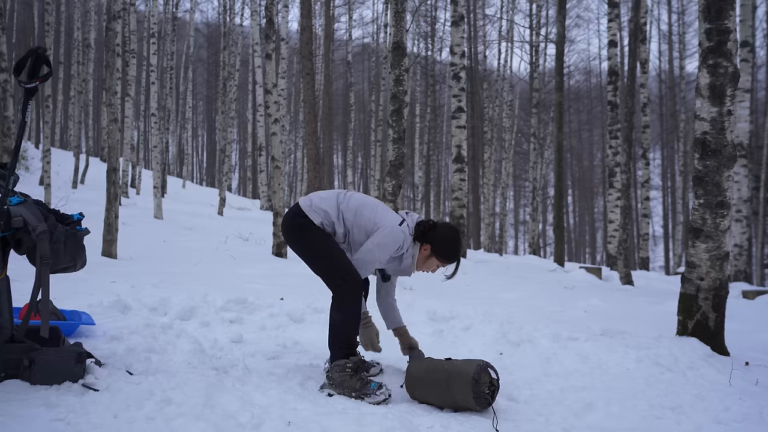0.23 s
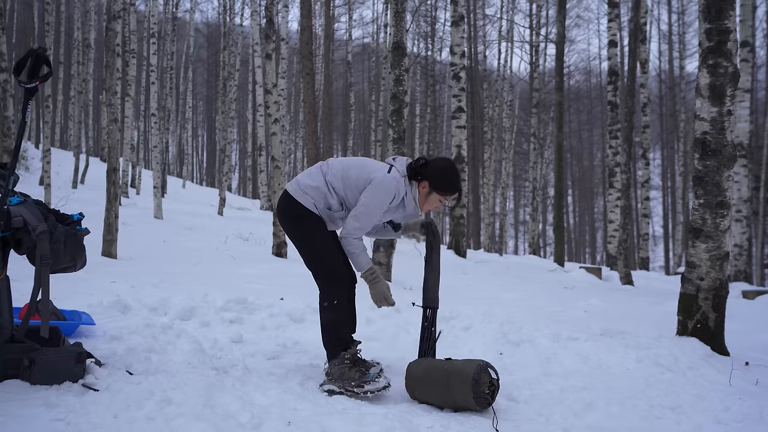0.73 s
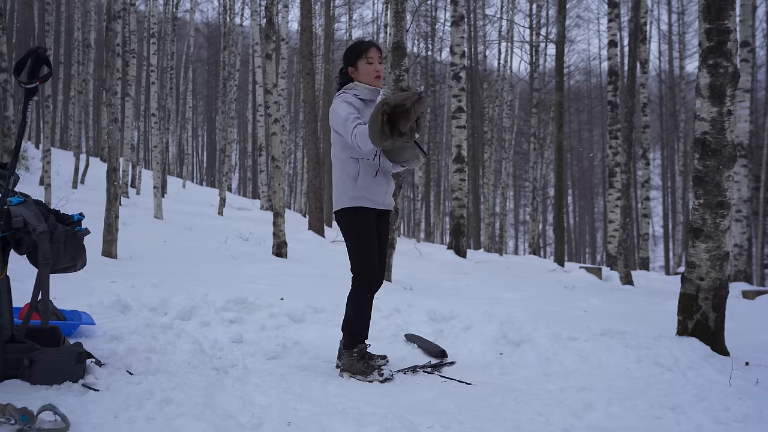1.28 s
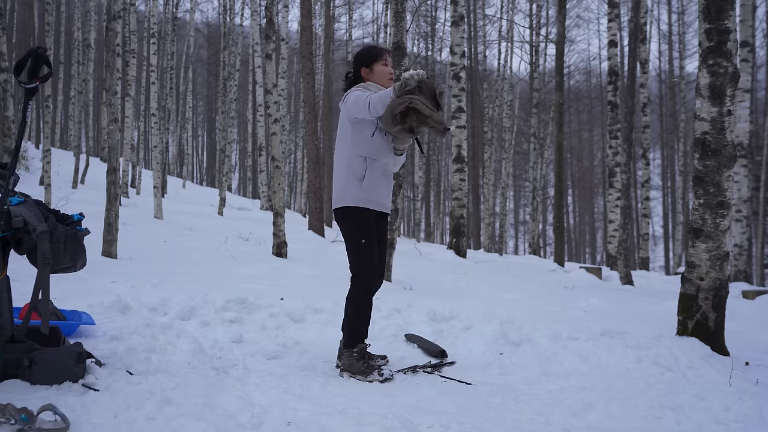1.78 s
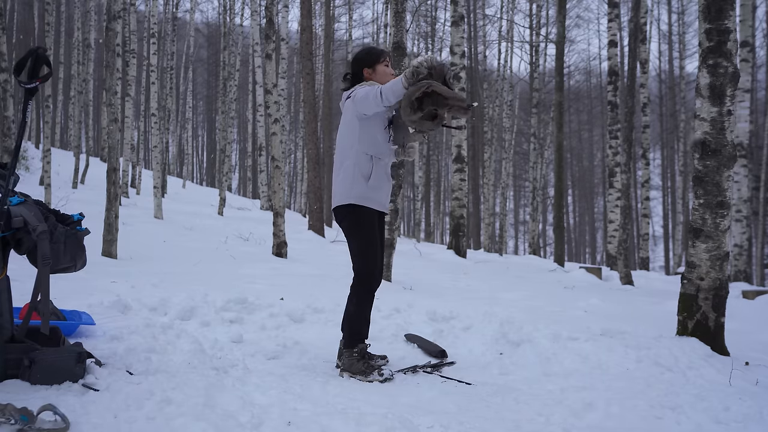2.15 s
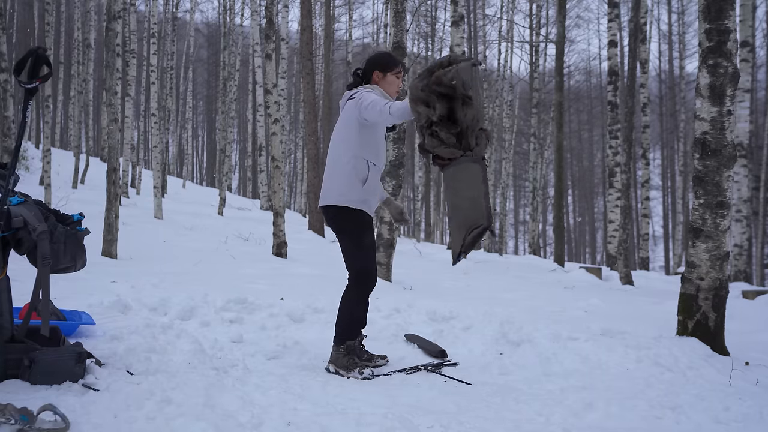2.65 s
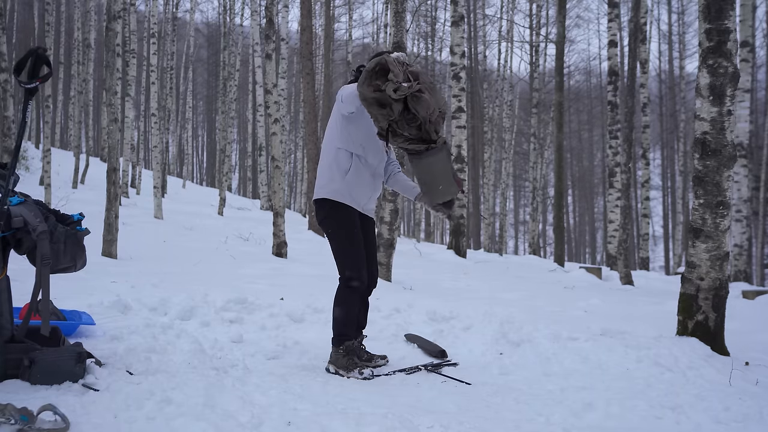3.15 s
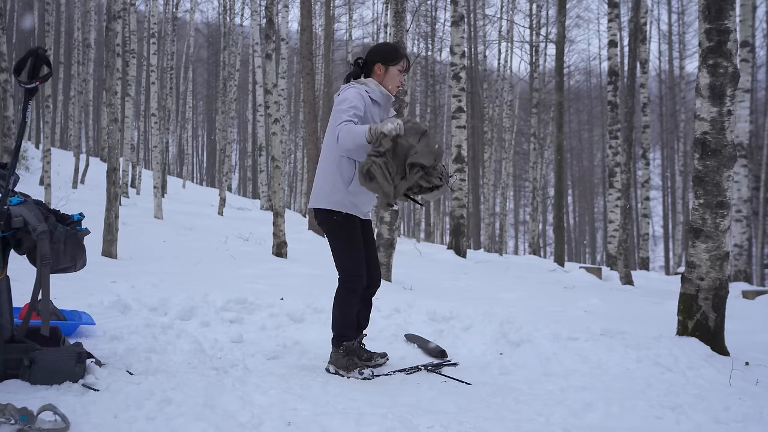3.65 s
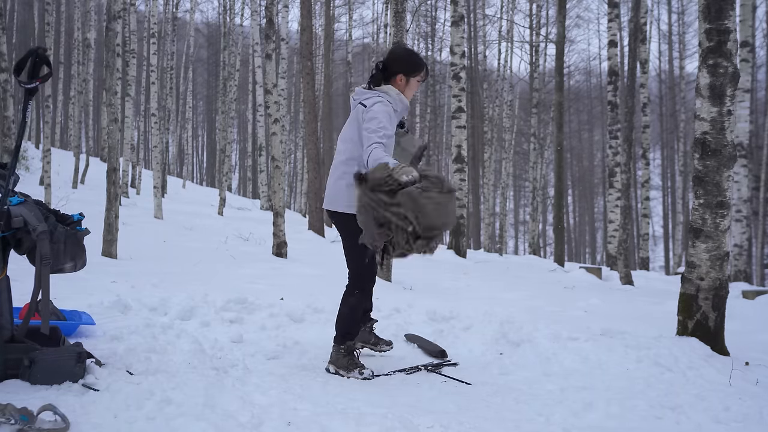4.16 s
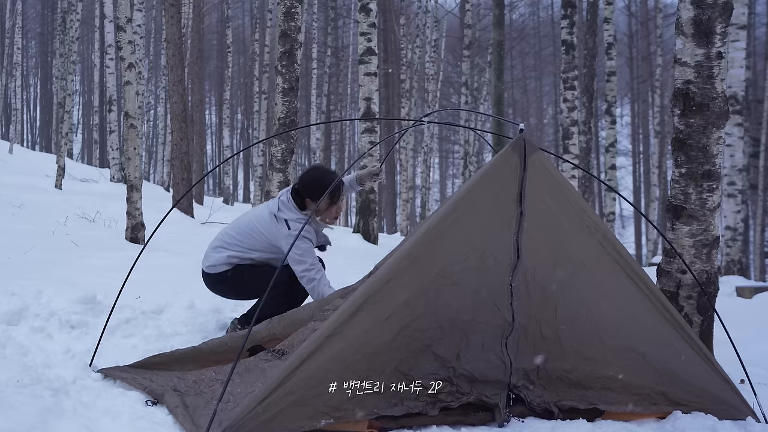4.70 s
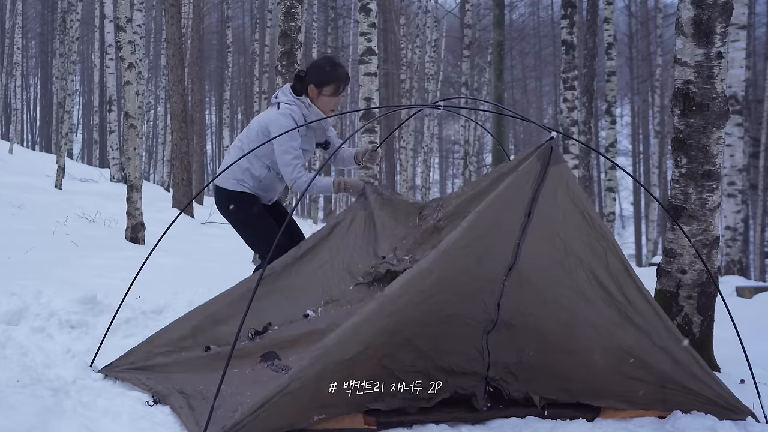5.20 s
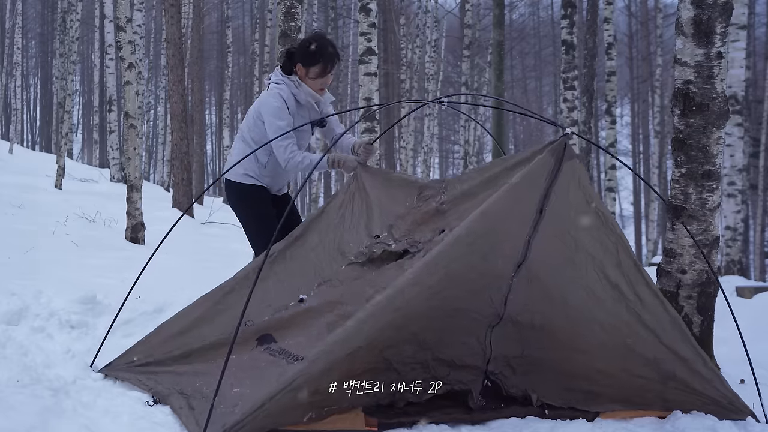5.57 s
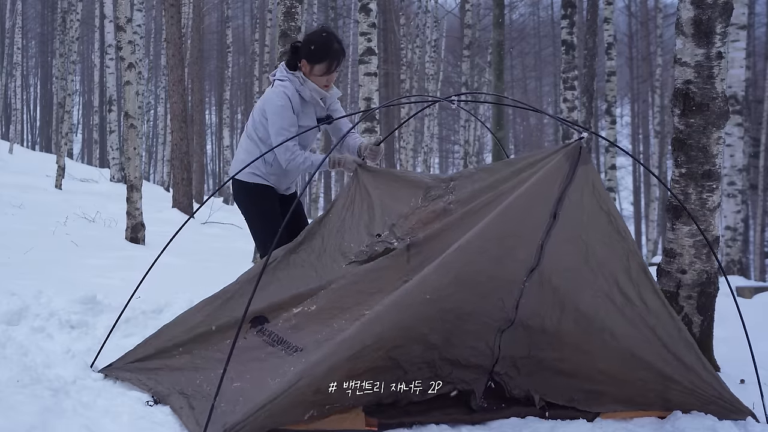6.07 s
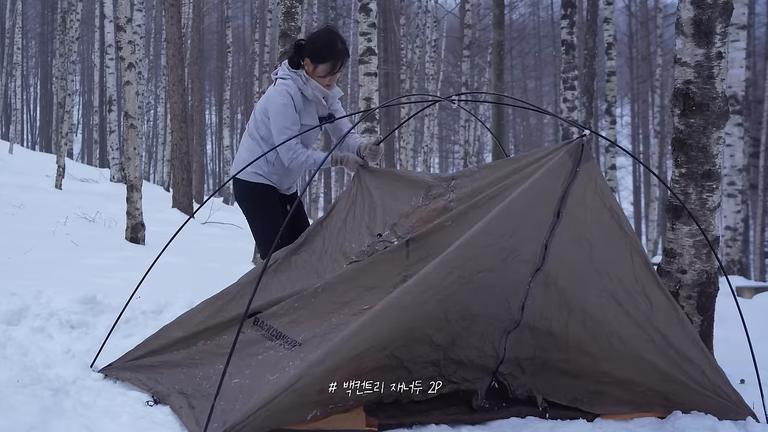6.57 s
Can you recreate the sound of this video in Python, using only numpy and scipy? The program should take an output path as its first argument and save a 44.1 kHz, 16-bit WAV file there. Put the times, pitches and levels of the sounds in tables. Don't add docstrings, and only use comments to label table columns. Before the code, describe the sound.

Stiff tent nylon rustles and crackles up close: a bag tugged out, metal pegs rattling briefly, cloth heaved, bundled, then a wide sheet lifted.

```python
import sys
import numpy as np
from scipy import signal
from scipy.fft import rfft, irfft, next_fast_len
from scipy.io import wavfile
from scipy.ndimage import uniform_filter1d

SR = 44100
rng = np.random.default_rng(int(sys.argv[2]) if len(sys.argv) > 2 else 0)


def persist_wave(psi):
    counts = np.round(np.clip(psi, -1, 1) * 32767).astype(np.int16)
    wavfile.write(sys.argv[1], SR, np.atleast_2d(counts).T)


def volts_from_db(level):
    exponent = np.asarray(level, float) / 20
    return 10 ** exponent


N = 301644
TIME = np.arange(N) / SR
SILENT_DB = -120.

# start_s, end_s
SPANS = ((0, .955), (.955, 1.252), (1.257, 3.224), (3.224, 4.713), (4.717, 6.84))
# crackles_per_s, size_spread_db, crackle_ms, crackle_share_db, flicker_db, fleck_hz, fleck_db
NYLON_GRAIN = (600, 4.4, 2.8, 2.2, 1.94, 2840, 1.7)
# t60_ms, rise_ms, broad_part_db, first_kick_over_tail
NYLON_SNAP = (8, 0.8, -2.5, 2.5)


def unit(x):
    return x / np.sqrt(np.mean(x ** 2))


def band(x, low_hz, high_hz, order):
    return signal.sosfilt(signal.butter(order, (low_hz, high_hz), "band", fs=SR, output="sos"), x)


def fade_in(start_s, length_s):
    return np.clip((TIME - start_s) / length_s, 0, 1)


def walk(rate, n=N):
    hold = int(SR / rate)
    held = rng.standard_normal(n // 500)[np.arange(n) // hold]
    return unit(uniform_filter1d(uniform_filter1d(held, hold), hold))


def cloth(levels, tone, rate, spread_db, ms, share_db, flicker_db, fleck_hz, fleck_db):
    live = np.flatnonzero(levels[0] > -100)
    n = next_fast_len(len(live) + 4096)
    part = np.pad(levels[:, live], ((0, 0), (0, n - len(live))), constant_values=SILENT_DB)
    hz = np.maximum(np.arange(n // 2 + 1) * SR / n, 1)
    shared = crackle(rate, spread_db, ms, n)
    tug = walk(21.77, n)
    spectrum = 0
    for gain, db, grainy in zip(registers(tone, hz), part, (0.68, 0.71, 0.71, 0.78)):
        own = crackle(rate, spread_db, ms, n)
        creases = 0.92 * shared ** 2 + 0.27 * own ** 2
        grain = np.sqrt(1 + (grainy * volts_from_db(share_db)) ** 2 * creases)
        flicker = volts_from_db(flicker_db * (tug + 0.49 * walk(30.12, n)))
        drive = grain * flicker * volts_from_db(db) * rng.standard_normal(n)
        scale = np.sqrt(np.mean(gain ** 2) * np.mean(drive ** 2) / np.mean(volts_from_db(db) ** 2))
        spectrum = spectrum + gain * rfft(drive) / scale
    whole = np.zeros(2 * N)
    whole[live[0]:live[0] + n] = irfft(spectrum, n)
    return whole[:N] + flecks(levels[0], rate, fleck_hz, fleck_db)


def registers(tone, hz):
    split_hz = (700, 2800, 8000)
    tone_hz, db = np.transpose(tone)
    gain = volts_from_db(np.interp(np.log(hz), np.log(tone_hz), db))
    low, mid, high = (1 / (1 + (edge / hz) ** 5) for edge in split_hz)
    return gain * np.sqrt([mid - high, 1 - low, low - mid, high])


def crackle(rate, spread_db, ms, n):
    chance = rng.random((2, n))
    size_db = spread_db * np.minimum(-np.log(1 - chance[1]), 3)
    power = (chance[0] < rate / SR) * volts_from_db(size_db) ** 2
    for share in (.6, 1.4):
        power = signal.lfilter([1], [1, -np.exp(-1000 / (share * ms * SR))], power)[::-1]
    return unit(np.sqrt(np.abs(power)))


def flecks(swish_db, rate, hz, db):
    when, pitch, size = rng.random((N // 50, 3)).T
    wanted = np.arange(len(when)) < rate * N / SR
    heard = wanted & (swish_db[(when * N).astype(int)] > -100)
    start = (when[heard] * N).astype(int)[:, None]
    t = np.arange(256)
    turns = hz * 2.2 ** (2 * pitch[heard, None] - 1) * t / SR
    size_db = db + swish_db[start] - 3 * np.log(1 - .95 * size[heard, None])
    pops = volts_from_db(size_db) * np.sin(2 * np.pi * turns) * np.exp(-turns / 1.4) * np.minimum(turns, 1)
    return np.bincount((start + t).ravel(), pops.ravel(), N + 256)[:N]


def follow(moves, law, span):
    usual_effort_db, usual_slack_db = -35, -10
    s, effort, slack = np.vstack(moves).T
    s = np.maximum.accumulate(s)
    effort, slack = (np.interp(TIME, s, column) for column in (effort, slack))
    rub, sheen = (db + per_effort * (effort - usual_effort_db) + per_slack * (slack - usual_slack_db)
                  for db, per_effort, per_slack in law)
    seen = (TIME >= span[0]) & (TIME <= span[1])
    return np.where(seen, [effort, effort + slack, rub, sheen], SILENT_DB)


def snaps(events, t60_ms, rise_ms, broad_db, kick):
    out, t = np.zeros(N + 1024), np.arange(1024) / SR
    rise = np.minimum(1000 * t / max(rise_ms, .1), 1)
    fall = volts_from_db(-60000 * t / max(t60_ms, 2)) * rise
    burst = fall * rng.standard_normal((48, 4, len(t)))[:len(events)]
    burst[:, :, np.argmax(fall)] = kick
    broad = band(burst[:, 0], 2000, 13700, 4)
    dull = band(burst[:, 1], 610, 1810, 4)
    bright = band(burst[:, 2], 8700, 12200, 4)
    for k, (s, db, hz, dull_db, bright_db) in enumerate(events):
        fold = band(burst[k, 3], hz * .65, hz * 1.5, 2)
        parts = zip((broad_db, dull_db, bright_db, 0), (broad[k], dull[k], bright[k], fold))
        crack = sum(volts_from_db(part_db) * part / np.abs(part).max() for part_db, part in parts)
        i = int(s * SR)
        out[i:i + len(t)] += volts_from_db(db - 2.5) * crack / np.abs(crack).max()
    return out[:N]


def peg_bag():
    # start_s, effort_db, slack_db
    reaching = [
        (0, -60, -13),
        (.042, -60.5, -3),
        (.053, -70, -44),
        (.088, -55, -8),
    ]
    tug_1 = [(0.09, -41, -31), (.156, -29.5, -21), (.205, -26.5, -30), (.225, -32, -25), (.3, -34, -22),
             (.322, -30, -19), (.376, -29.5, -14)]
    tug_2 = [
        (.381, -38, -7),
        (.505, -31, -23),
        (.559, -30.5, -15),
        (.589, -28, -19),
        (.672, -33.5, -12.5),
    ]
    pull_out = [
        (.738, -23, -21),
        (.762, -29, -21),
        (.81, -35, -18.5),
        (.87, -31.5, -16),
        (.9, -41.5, -24),
        (.95, -47, -32),
    ]
    # usual_db, db_per_db_effort, db_per_db_slack
    hand_law = ((-37.5, 0.65, 0.3), (-49, 1.2, 2.5))
    # pitch_hz, level_db
    colour = [(71, -57), (120, -30.5), (260, -13.5), (1200, -19.5), (1450, -14), (3840, -11.5),
              (4620, -8.5), (6800, -14), (10000, -14), (15700, -11)]
    # crackles_per_s, size_spread_db, crackle_ms, crackle_share_db, flicker_db, fleck_hz, fleck_db
    texture = (600, 9.5, 0.7, 1, 0.86, 4400, -1)
    # start_s, peak_db, pitch_hz, dull_db, bright_db
    fold_events = [(0.015, -40, 3400, -1, -25), (0.093, -14.5, 5040, -38, -17),
                   (0.2004, -20, 5500, -25, -20), (0.315, -17, 4660, -13, -20),
                   (0.3312, -17, 3230, -7, -12), (0.356, -5, 4820, -23, -12), (0.3669, -5, 6060, -16.5, -8),
                   (0.393, -18, 5900, -18, -17), (0.415, -15, 5680, -24, -18),
                   (0.4234, -15, 3790, -19, -17), (0.4374, -29, 3740, -23, -21),
                   (0.4566, -16, 6100, -26, -27), (0.47, -12, 5760, -21, -24),
                   (0.5072, -12, 3570, -21, -23), (0.539, -13.5, 4570, -19, -21),
                   (0.5581, -16, 6080, -26, -23), (0.571, -8, 5600, -29, -20), (0.589, 0.5, 5040, -37, -18),
                   (0.608, -22, 4030, -25, -17), (0.619, -17, 4320, -24, -24), (0.628, -12, 5210, -24, -23),
                   (0.6345, -11, 4500, -26, -23), (0.6945, -7.5, 4830, -14, 0),
                   (0.7236, -4.5, 5500, -19, -7), (0.7446, -6, 5450, -21, -22),
                   (0.761, -13, 8150, -24, -20), (0.7774, -9, 4840, -25, -22),
                   (0.793, -12.5, 5520, -26, -20), (0.8353, -15, 5430, -18, -19),
                   (0.8562, -13, 4960, -29, -25), (0.886, -19, 5500, -29, -16),
                   (0.9044, -30, 5040, -21, -21)]
    # t60_ms, rise_ms, broad_part_db, first_kick_over_tail
    snap_shape = (31, 1.6, -9.5, 2.5)
    slide = cloth(follow([reaching, tug_1, tug_2, pull_out], hand_law, SPANS[0]), colour, *texture)
    scene_change_s = .042
    fade = np.where(TIME < scene_change_s, 1, fade_in(scene_change_s, .015))
    return (slide + snaps(fold_events, *snap_shape)) * fade


def pegs():
    # start_s, effort_db, slack_db
    rattling = [(.955, -29.5, -26), (.989, -31.5, -26), (1.0425, -30, -28), (1.045, -16, -31),
                (1.059, -16, -36), (1.072, -29, -32), (1.08, -35, -30), (1.125, -29.5, -33),
                (1.161, -35.5, -23)]
    rattling_again = [(1.1625, -21, -42), (1.171, -27.5, -34), (1.186, -23, -36), (1.208, -31.5, -25),
                      (1.223, -36, -29), (1.226, -22, -32), (1.252, -30.5, -28)]
    # usual_db, db_per_db_effort, db_per_db_slack
    hand_law = ((-37, 0.3, 0.067), (-40.5, 1.56, 0.084))
    # pitch_hz, level_db
    colour = [(47, -65), (80, -40), (559, -27), (700, -39), (1410, -17.5), (1840, -26), (2740, -12.5),
              (6070, 0), (14100, -23.5), (15700, -30)]
    # crackles_per_s, size_spread_db, crackle_ms, crackle_share_db, flicker_db, fleck_hz, fleck_db
    texture = (970, 5, .8, 2, 1.2, 5500, 0.61)
    # start_s, peak_db, pitch_hz, dull_db, bright_db
    knock_events = [(0.9554, -24, 8890, -35, -17), (0.9624, -16, 5910, -34, -10),
                    (0.9679, -5.5, 10500, -42, -2), (1.0001, -18, 4870, -39, -12),
                    (1.0054, -17, 8900, -33, -18), (1.0163, -4.5, 7420, -37, -19),
                    (1.023, -11, 6060, -30, -13), (1.037, -3, 7100, -37, -18), (1.043, 2, 5600, -41, -12),
                    (1.0486, -5, 5990, -44, -14), (1.053, -1, 6260, -22, -8), (1.089, -10, 4650, -35, -17),
                    (1.1084, -21, 5590, -30, -13), (1.1183, -13, 4640, -29, -17),
                    (1.1375, -10, 4470, -33, -22), (1.163, -1, 5370, -36, -15),
                    (1.1794, -8.5, 6200, -30, -21), (1.183, -7, 6000, -39, -26),
                    (1.1984, -12, 5700, -32, -18), (1.2143, -7, 5590, -32, -17),
                    (1.2246, -1.5, 5860, -42, -24), (1.237, -1, 6050, -39, -18),
                    (1.245, -3.5, 5500, -34, -22)]
    # t60_ms, rise_ms, broad_part_db, first_kick_over_tail
    knock_shape = (13, 0.85, -8, 3.5)
    slide = cloth(follow([rattling, rattling_again], hand_law, SPANS[1]), colour, *texture)
    knocks = snaps(knock_events, *knock_shape)
    return (slide + knocks + ring(.7 * slide + knocks)) * (TIME < SPANS[1][1])


def ring(x):
    # pitch_hz, level_db, t60_s
    peg_modes = [(4665, -9, .02), (10400, -4, .012), (11950, -2, .013), (13800, 2, .015), (14050, 2, .015)]
    out = 0
    for hz, db, t60_s in peg_modes:
        r = 1000 ** (-1 / (t60_s * SR))
        resonator = [1, -2 * r * np.cos(2 * np.pi * hz / SR), r * r]
        out = out + volts_from_db(db) * (1 - r) * 2 * signal.lfilter([1, 0, -1], resonator, x)
    return out


def sack():
    # start_s, effort_db, slack_db
    dragging = [
        (1.257, -85, 3),
        (1.291, -50, 0),
        (1.321, -37.5, -4),
        (1.42, -37, -5.5),
        (1.488, -29.5, -12),
        (1.56, -28, -5.5),
        (1.704, -29.5, -3.5),
    ]
    heaving = [
        (1.86, -25, -5.5),
        (1.94, -26, 2),
        (2.03, -27, -1),
        (2.153, -29.5, -8.5),
        (2.215, -29.5, -0.5),
        (2.252, -28.5, 2.5),
    ]
    shaking = [(2.263, -40.5, 1.5), (2.374, -41.5, -2.5), (2.464, -50, -7), (2.547, -31, -9.5),
               (2.655, -39.5, -6.5), (2.703, -45, -2.5), (2.721, -47, -6), (2.787, -57.5, -3)]
    dangling = [(2.919, -55, -4), (2.942, -48, -7), (2.996, -52.5, -7.5), (3.008, -48, -10),
                (3.04, -52, -11), (3.048, -59, 0), (3.11, -63.5, 2), (3.222, -51.5, -6)]
    # usual_db, db_per_db_effort, db_per_db_slack
    hand_law = ((-35.5, 0.76, 0.13), (-41.5, 1.25, 0.49))
    # pitch_hz, level_db
    colour = [(71, -35.5), (120, -21), (226, -9), (294, -6.5), (500, -6.5), (850, -8), (1500, -5),
              (2890, -7), (5010, -3.5), (7530, -9.5), (15700, -23.5)]
    # start_s, peak_db, pitch_hz, dull_db, bright_db
    drag_events = [(1.3175, -19, 3840, -20, -28), (1.4954, -7, 4680, -10, -21),
                   (1.5254, -20, 3570, -10, -19), (1.5424, -18, 3690, -16, -19),
                   (1.572, -7, 5880, -15, -19), (1.5902, -1.5, 3420, -12, -27),
                   (1.5935, -4, 3270, -13, -24), (1.661, -4.5, 3460, -21, -23),
                   (2.102, -12.5, 4120, -16, -18), (2.2403, -0.5, 4560, -16, -29),
                   (2.2922, -16, 3879, -6, -14), (2.3277, -20, 4150, -12, -11),
                   (2.339, -12.5, 3300, -7, -1), (2.3443, -20, 2730, -15, -19),
                   (2.6565, -15.5, 3380, -11, -23), (2.7234, -27, 13500, -22, -8),
                    (2.7282, -30, 3910, -19, -19), (2.751, -34, 2421, -15, -17),
                    (2.7954, -39, 2000, -10, -21), (2.924, -25, 6610, -12, -17),
                    (2.9464, -35, 2190, -9, -13), (3.0204, -30, 2440, -19, -25),
                    (3.0394, -36, 4440, -11, -24), (3.0814, -41, 2370, -13, -30)]
    slide = cloth(follow([dragging, heaving, shaking, dangling], hand_law, SPANS[2]), colour, *NYLON_GRAIN)
    folds = snaps(drag_events, *NYLON_SNAP)
    return (slide + folds) * fade_in(SPANS[2][0], 0.036)


def bundle():
    # start_s, effort_db, slack_db
    gathering = [(3.226, -44.5, -16), (3.28, -30.5, -3), (3.332, -37.5, -6), (3.44, -37.5, -3),
                 (3.495, -42.5, -4), (3.57, -32.5, -6.5), (3.62, -36.5, -10), (3.65, -33.5, -9),
                 (3.7, -36, -10)]
    hauling = [(3.712, -32, -7.5), (3.885, -32.5, -12), (3.9, -28, -6), (3.955, -28, -6),
               (3.968, -24.5, -5), (3.99, -24, -0.5), (4.034, -28, 7.5), (4.046, -33, 6)]
    setting_down = [
        (4.056, -42, -9),
        (4.123, -42.5, 1),
        (4.129, -31.5, 1),
        (4.174, -38.5, -7),
        (4.341, -39.5, -9),
        (4.425, -44, -5),
        (4.491, -34.5, -5.5),
        (4.575, -45.5, -0.5),
        (4.713, -43, -7.5),
    ]
    # usual_db, db_per_db_effort, db_per_db_slack
    hand_law = ((-33, 0.61, 0.1556), (-37, 1.67, 0.01))
    # pitch_hz, level_db
    colour = [(71, -38), (120, -23.5), (260, -8), (500, -6.5), (850, -9), (1700, -4.5), (3100, -6.5),
              (4800, -4), (8000, -9.5), (15700, -20)]
    # start_s, peak_db, pitch_hz, dull_db, bright_db
    fold_events = [(3.2256, -19.5, 4680, -24, -16), (3.2314, -25, 2760, -21, -2),
                   (3.235, -14, 2310, -17, 5), (3.2514, -16, 4820, -19, -20),
                   (3.267, -11.5, 2130, -21, -17), (3.273, -12.5, 2540, -19, -18),
                   (3.29, -22, 1780, -15, -18), (3.299, -14, 1220, -14, -20), (3.3087, -14, 1960, -12, -19),
                   (3.3424, -25, 1570, -14, -21), (3.439, -18, 1540, -18, -23),
                   (3.522, -21, 1885, -16, -22), (4.125, -22, 1310, -22, -19),
                   (4.1357, -18, 1480, -15, -21), (4.6263, -27, 1950, -8, -23)]
    slide = cloth(follow([gathering, hauling, setting_down], hand_law, SPANS[3]), colour, *NYLON_GRAIN)
    return slide + snaps(fold_events, *NYLON_SNAP)


def fly():
    # start_s, effort_db, slack_db
    lifting = [
        (4.718, -40, -18),
        (4.748, -31.5, -9),
        (4.778, -32, -3.5),
        (4.88, -28, -8),
        (4.981, -28, -8.5),
    ]
    settling = [
        (5.215, -27.5, -11),
        (5.52, -30, -10),
        (5.706, -31.5, -8),
        (6.023, -34, -10.5),
        (6.688, -41.5, -12.5),
        (6.837, -40, -13),
    ]
    # usual_db, db_per_db_effort, db_per_db_slack
    hand_law = ((-38.5, 0.91, 0.6), (-39, 1.5, -0.44))
    # pitch_hz, level_db
    colour = [(71, -47), (120, -23), (184, -9.5), (333, -0.5), (665, -6), (1420, -2), (2950, -5.5),
              (4620, -3), (5550, -4.5), (10400, -11.5), (15700, -21.5)]
    # crackles_per_s, size_spread_db, crackle_ms, crackle_share_db, flicker_db, fleck_hz, fleck_db
    texture = (293, 4, 0.3, -3.5, 0.78, 3898.5, -8)
    # start_s, peak_db, pitch_hz, dull_db, bright_db
    fold_events = [(4.7301, -23, 5160, -12, -19), (4.8469, -5, 4590, -17, -21),
                   (4.8554, -5.5, 4260, -16, -18), (4.977, -6, 5600, -12, -16),
                   (5.3968, -14, 4600, -19, -15), (5.4104, -14, 5300, -16, -18),
                   (5.4454, -22, 4140, -20, -13), (5.4564, -5, 6000, -14, -15),
                   (5.472, -19, 3910, -19, -18), (5.6115, -13, 5540, -3, -17), (5.6494, -16, 3960, -4, -18),
                   (6.5196, -28, 3730, -20, -19), (6.584, -10, 5230, -18.5, -23),
                   (6.6283, -21, 5370, -22, -17), (6.731, -19, 3720, -22, -23),
                   (6.7517, -14.5, 4800, -21, -25)]
    tick_events = [(5.512, -25, 2500, -8, -25), (5.676, -14, 1600, -6, -25), (5.694, -18, 900, -7, -25),
                   (5.876, -14, 750, 3, -25), (6.201, -16.5, 1905, -2, -25), (6.287, -24, 2000, -14, -27),
                   (6.33, -23, 1499, 0, -25), (6.419, -15, 2310, -6, -23), (6.483, -12.5, 2600, -18, -25),
                   (6.49, -26, 1310, -10, -25), (6.641, -21, 2300, -14, -23), (6.652, -25, 1690, -18, -25),
                   (6.7595, -25, 1710, -9, -25)]
    # t60_ms, rise_ms, broad_part_db, first_kick_over_tail
    snap_shape = (9.5, 0.3, -7, 4.5)
    slide = cloth(follow([lifting, settling], hand_law, SPANS[4]), colour, *texture)
    folds = snaps([*fold_events, *tick_events], *snap_shape)
    return (slide + folds) * fade_in(SPANS[4][0], 0.012)


def ridges():
    # start_s, end_s, pitch_hz, width_hz, level_db
    rubs = [(0.094, 0.43, 3160, 950, -39), (0.52, 0.91, 5500, 1000, -33), (2.0, 2.05, 236, 70, -25),
            (1.89, 1.96, 386, 88, -31), (1.28, 1.38, 1770, 1300, -37), (2.82, 3.04, 10900, 3100, -52),
            (1.61, 2.08, 1060, 570, -33.5), (2.19, 2.26, 5100, 2600, -25.5), (2.86, 2.9, 1460, 590, -53),
            (2.8, 2.98, 6600, 1600, -56), (0.16, 0.22, 5300, 2200, -40), (3.83, 3.96, 1270, 570, -34),
            (0.1, 0.43, 1680, 380, -43), (0.41, 0.88, 1490, 610, -41), (3.5, 3.7, 1860, 1300, -35),
            (1.88, 2.084, 9300, 3400, -29.5), (2.995, 3.045, 2400, 950, -46), (2.92, 2.97, 1650, 700, -50),
            (3.12, 3.22, 1550, 550, -61), (4.9, 5.35, 5250, 1500, -32), (5.6, 5.86, 1460, 140, -38.5)]
    out = np.zeros(N)
    grit = crackle(300, 2.5, 1.9, N) * volts_from_db(2.6 * walk(40))
    noise = grit * rng.standard_normal(N)
    for t0, t1, hz, width_hz, db in rubs:
        span = slice(int(t0 * SR), int(t1 * SR))
        swell = np.abs(np.sin(np.pi * (TIME[span] - t0) / (t1 - t0))) ** 0.24
        out[span] += volts_from_db(db) * swell * unit(band(noise[span], hz - width_hz / 2, hz + width_hz / 2, 2))
    return out


def more_fold_snaps():
    # start_s, peak_db, pitch_hz, dull_db, bright_db
    more_snaps = [(.6728, -15, 6000, -12, -5), (.9207, -31, 1900, 0, -14), (1.449, -11, 3600, -16, -8.5),
                  (1.481, -12.5, 1210, -2, -14), (1.682, -11, 3200, -12, -16), (1.735, 0.5, 7560, -14, -15),
                  (2.883, -35, 5800, -25, -20), (3.002, -27, 5600, -8, -9), (3.132, -27.5, 4000, -6, -23)]
    return snaps(more_snaps, *NYLON_SNAP)


def frost_pricks():
    # start_s, peak_db, pitch_hz
    pricks = [(0.4074, -21, 6550), (0.6084, -9, 7000), (0.6574, -17, 7770), (1.0754, -16, 6390),
              (1.1452, -10, 6400), (2.2144, -12, 6010), (2.2694, -33, 6020), (2.2824, -21, 7630),
              (2.3096, -29, 8080), (2.3144, -36, 6760), (2.324, -23, 8900), (2.3634, -40, 7080),
              (2.4164, -38, 6000), (2.4409, -34, 7760), (2.4604, -44, 7510), (2.4678, -29, 6600),
              (2.8644, -38, 11300), (3.4494, -25, 7950), (3.5653, -17, 6730), (5.0194, -21, 7650),
              (5.3794, -7, 7050), (5.6694, -21, 7090),
              (2.6289, -18, 5910), (2.7506, -29, 5810), (4.1144, -19, 5420), (4.3844, -34, 5160),
                   (4.4094, -33, 5570), (4.796, -23, 5920), (4.8144, -13, 5430), (4.8407, -12, 5440),
                   (4.8614, -12, 6160), (4.8864, -14, 5760), (4.9234, -9, 5310), (4.9524, -14, 6900),
                   (4.9844, -14, 6980)]
    # t60_ms, rise_ms, broad_part_db, first_kick_over_tail
    prick_shape = (5.5, 2, -10, 0)
    return snaps([(*prick, -40, -6) for prick in pricks], *prick_shape)


def parting():
    length_s, level_db = .046, -34
    apart = sum(np.sin(np.pi * fade_in(s, length_s)) for s in (1.904, 5.039))
    return volts_from_db(level_db) * apart * unit(band(rng.standard_normal(N), 4000, 10000, 4))


def scene():
    mono = peg_bag() + pegs() + sack() + bundle() + fly()
    mono = mono + ridges() + more_fold_snaps() + frost_pricks()
    side = parting()
    return np.array([mono + side, mono - side])


def overload_kick():
    # start_s, level_db, pitch_hz
    thump = (1.045, -47, 160)
    kick_s, kick_db, kick_hz = thump
    turn = 2 * np.pi * kick_hz * np.maximum(TIME - kick_s, 0)
    return volts_from_db(kick_db) * turn * np.exp(1 - turn)


def top_cut(x):
    return signal.sosfilt(signal.butter(12, 16290, fs=SR, output="sos"), x)


def record(dry):
    cut = signal.sosfilt(signal.butter(3, 120, "high", fs=SR, output="sos"), dry)
    cut = cut + overload_kick()
    cut = signal.sosfiltfilt(signal.ellip(8, .1, 40, 15800, fs=SR, output="sos"), cut)
    mix = np.clip(cut, -.99, .99)
    return top_cut(mix)


dry = scene()
out = record(dry)
persist_wave(out)
```